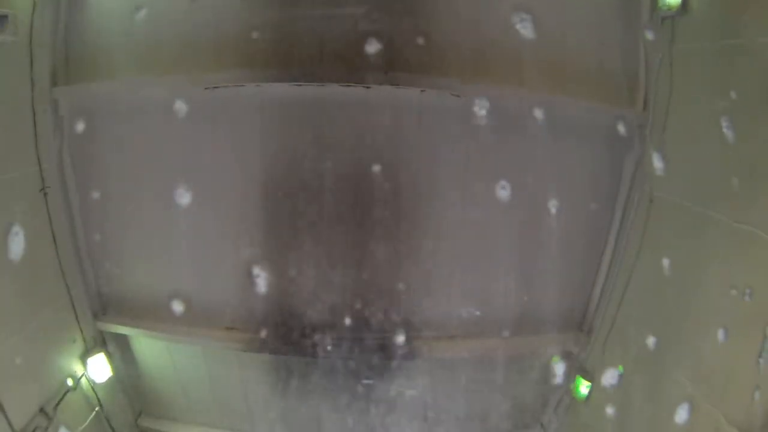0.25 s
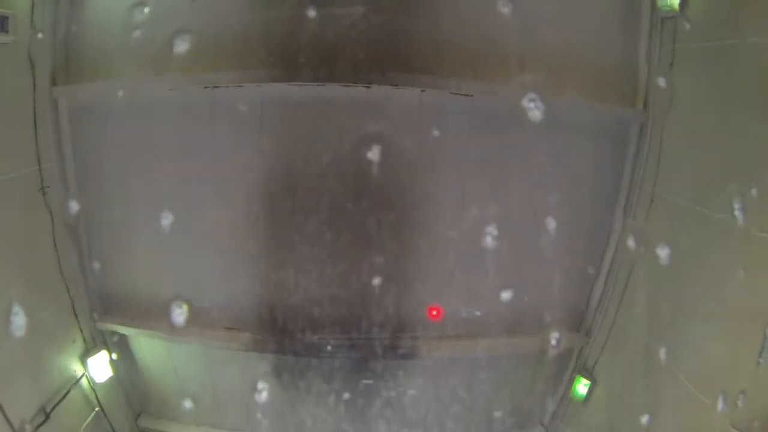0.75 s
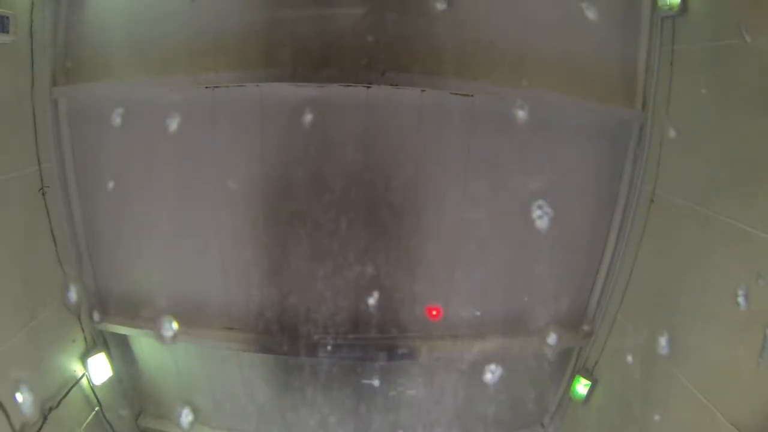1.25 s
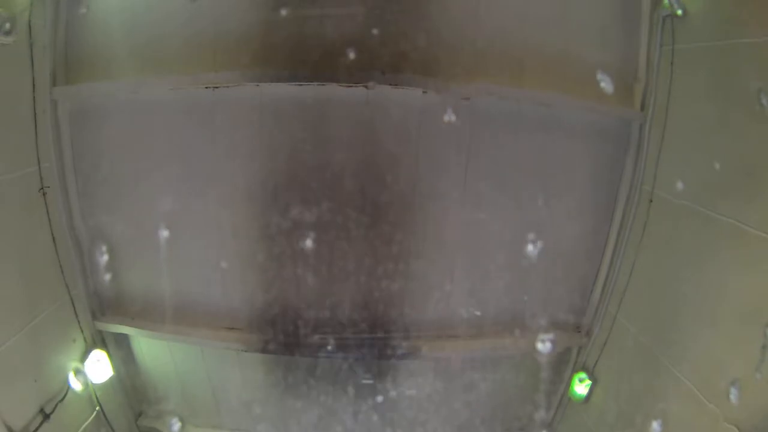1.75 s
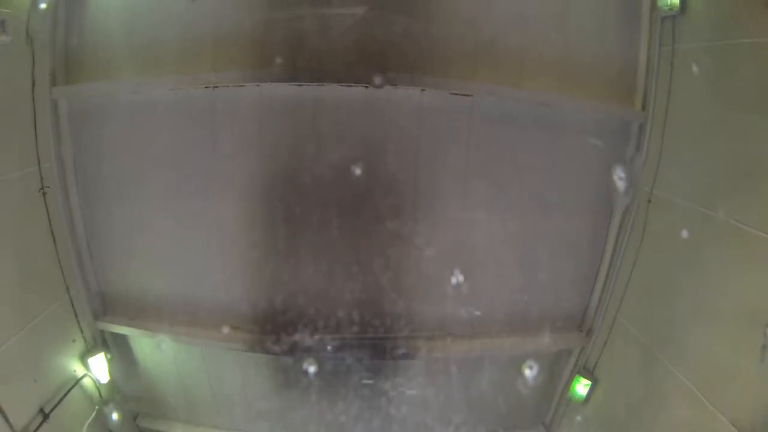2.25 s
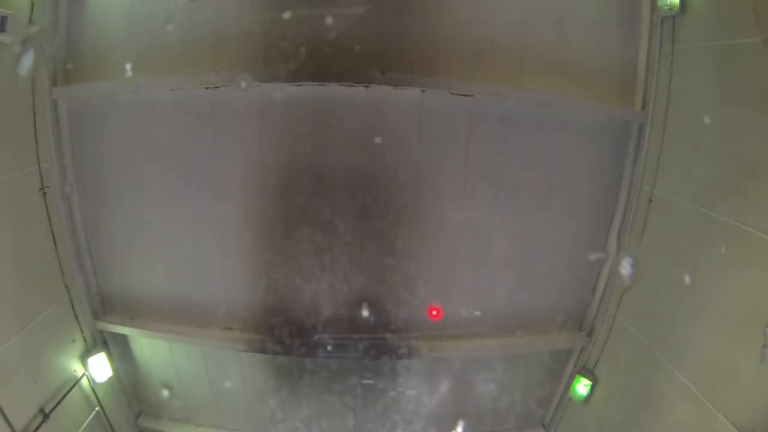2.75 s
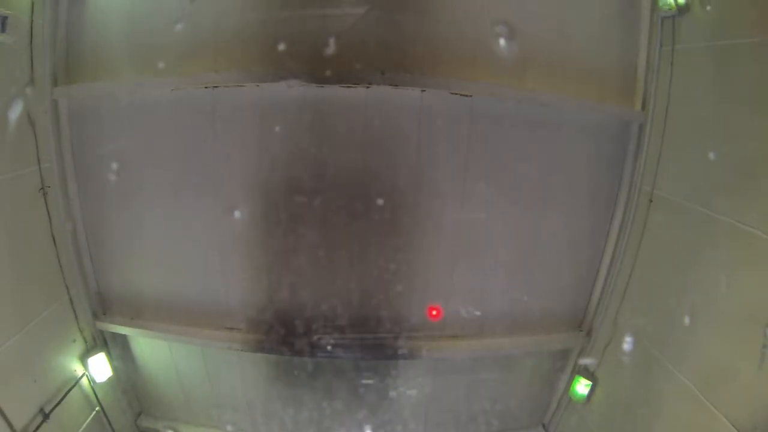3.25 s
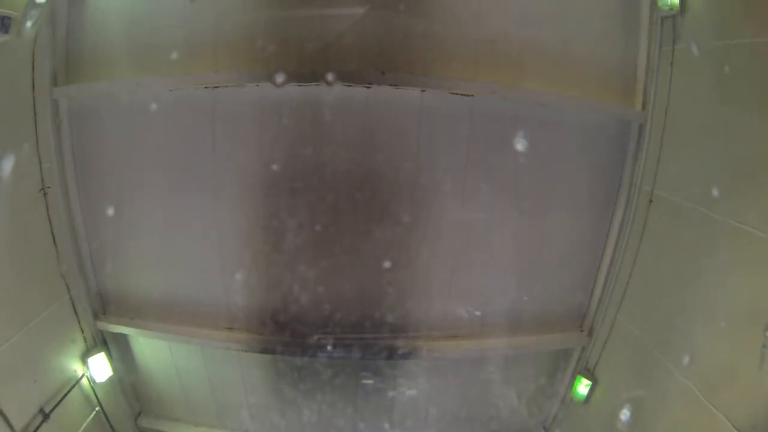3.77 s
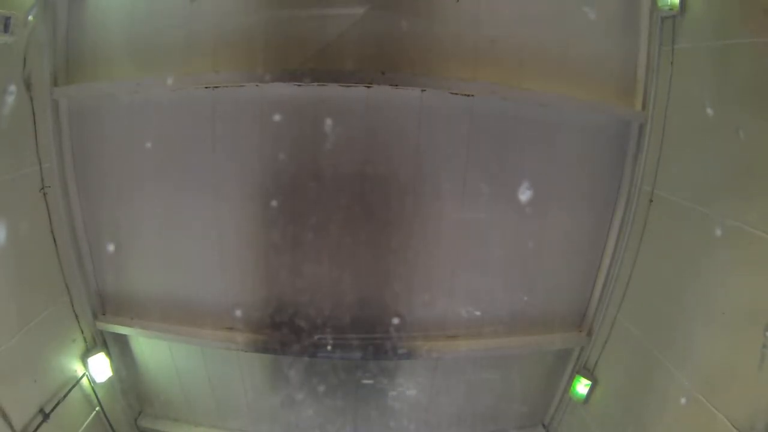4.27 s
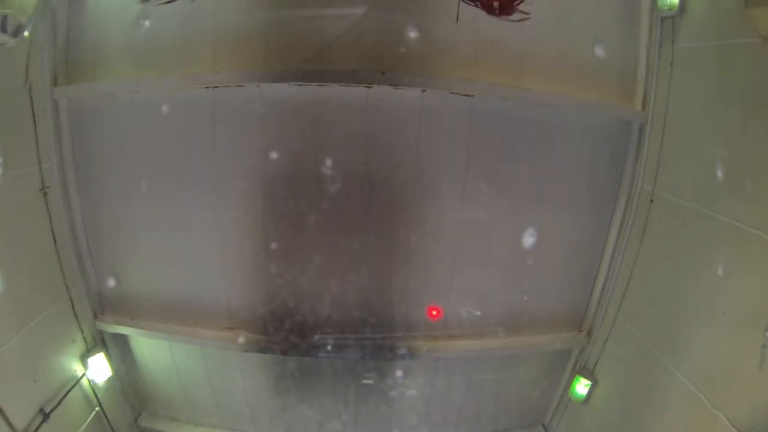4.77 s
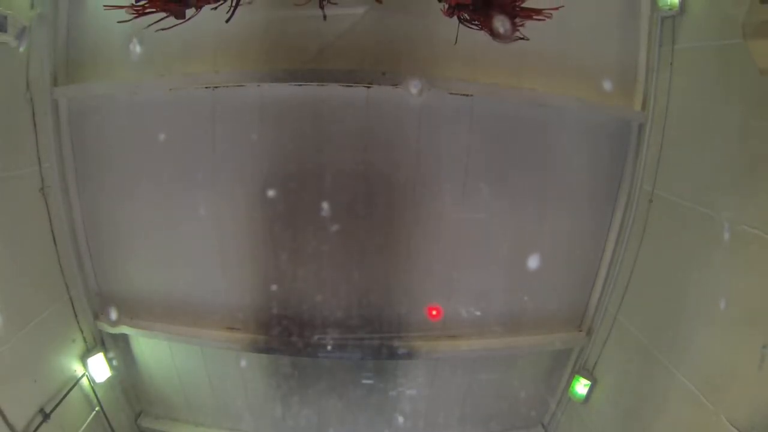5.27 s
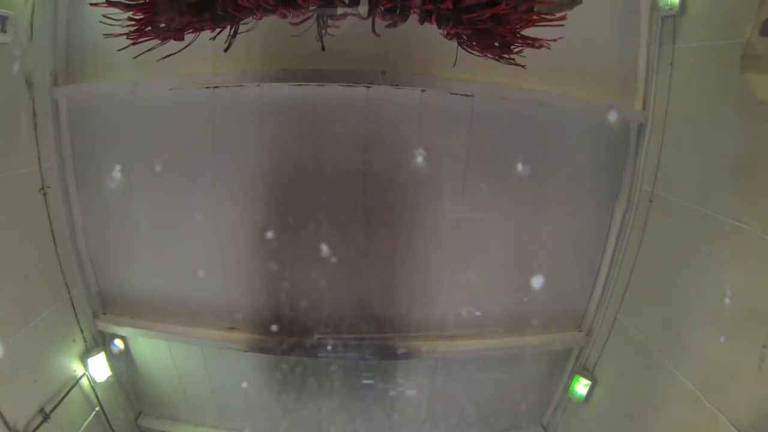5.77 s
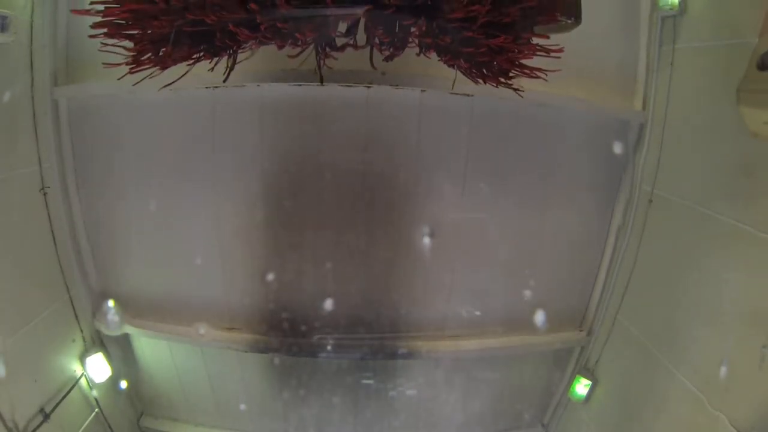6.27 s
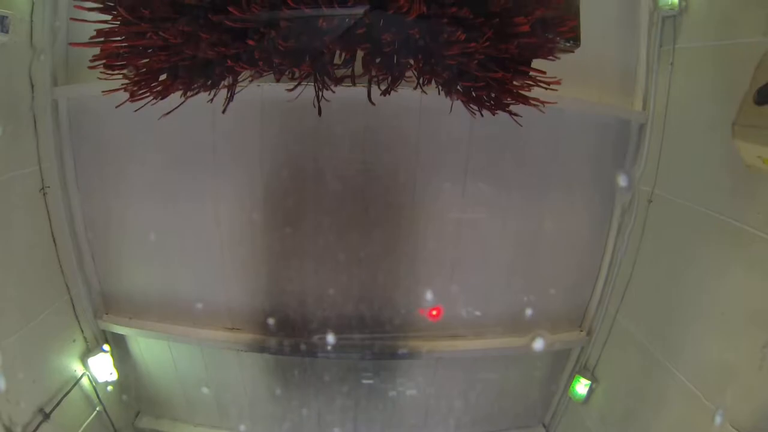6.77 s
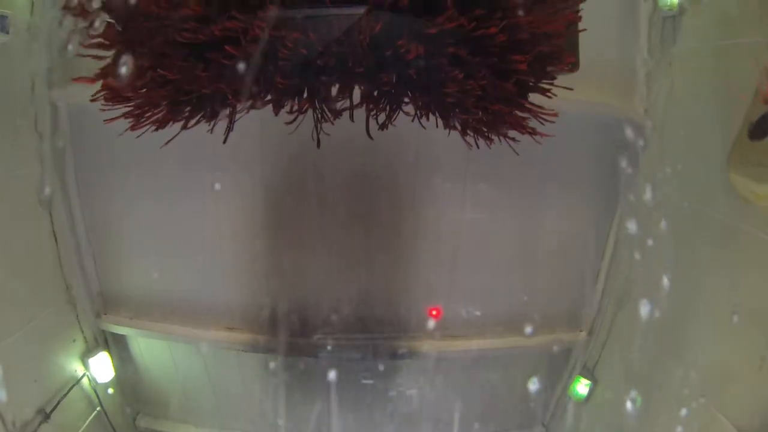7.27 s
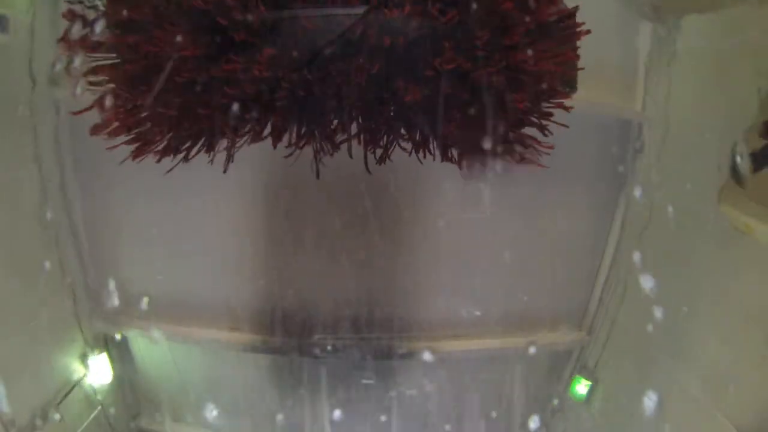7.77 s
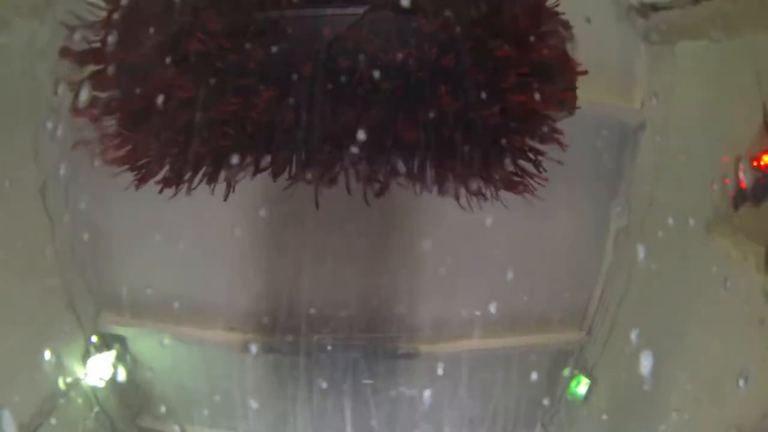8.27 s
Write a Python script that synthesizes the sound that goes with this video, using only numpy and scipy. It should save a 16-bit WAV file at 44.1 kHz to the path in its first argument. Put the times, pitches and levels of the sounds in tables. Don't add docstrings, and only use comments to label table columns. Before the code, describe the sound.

A muffled, close car wash perspective. The opening is very quiet, with soft hiss and low hum. Around three seconds sprays begin slapping the microphone casing in quick groups of four, with sharp water smacks and short gaps. Later the groups merge into longer, denser sheets of pelting water, over heavy body rumble and uneven metallic drumming, loudest at the end.

```python
import sys
import numpy as np
from scipy import signal
from scipy.fft import rfft, irfft
from scipy.io import wavfile
from scipy.ndimage import uniform_filter1d

SR = 44100
rng = np.random.default_rng(int(sys.argv[2]) if len(sys.argv) > 2 else 0)


def log_audio(samples):
    frames = np.atleast_2d(samples).T
    limited = np.clip(frames, -1, 1)
    pcm = np.round(limited * 32767).astype(np.int16)
    wavfile.write(sys.argv[1], SR, pcm)


def undo_db(level):
    steps = np.asarray(level, float) / 20
    return 10 ** steps


N = 375732
TIME = np.arange(N) / SR
FREQ = np.fft.rfftfreq(N, 1 / SR)
TURN_S, FIRST_LULL_S = 0.79, 1.965


def unit(x):
    return x / np.sqrt(np.mean(x ** 2))


def walk(rate_hz):
    hold = int(SR / rate_hz)
    steps = np.repeat(rng.standard_normal(N // hold + 1), hold)
    return unit(uniform_filter1d(uniform_filter1d(steps, hold), hold)[:N])


def lowpass(x, hz):
    return signal.sosfilt(signal.butter(2, hz, fs=SR, output="sos"), x)


def slope(points):
    hz, db = np.transpose(points)
    return undo_db(np.interp(np.log(FREQ + 1), np.log(hz), db))


def ring(x, modes):
    out = 0
    for k, (hz, width_hz, db) in enumerate(modes):
        b, a = signal.iirpeak(hz, hz / abs(width_hz), SR)
        out = out + (-1) ** k * undo_db(db) * signal.lfilter(b, a, x)
    return out


def noise_ring(hz, width_hz):
    return unit(ring(rng.standard_normal(N), [(hz, width_hz, 0)]))


def swells(table, steep):
    for s, db, half_ms, _ in table:
        yield undo_db(2 * db) * np.exp(-np.abs((TIME - s) * 1000 / half_ms) ** steep)


def lulls(depth_db, half_ms, every_s, count):
    middles_s = FIRST_LULL_S + every_s * np.arange(count)
    return sum(depth_db * np.exp(-((TIME - s) * 1000 / half_ms) ** 2) for s in middles_s)


# pitch_hz [Hz], density_db [dB per Hz]
BAY = [(130, -33), (220, -15), (559, -1.5), (741, -4.5), (795, -2.5), (868, -6.5), (1550, -6), (1850, -11),
       (2920, -8), (4700, -14.5), (9010, -22.5), (10200, -22), (14800, -31)]
# pitch_hz [Hz], width_hz [Hz], rise_db [dB]
BAY_HUMPS = [(2930, 490, 3), (5130, 220, 5.5), (10320, 570, 7.5), (13010, 110, -16), (13500, 1600, 6.5)]
# pitch_hz [Hz], width_hz [Hz], level_db [dB rms]
HUM = [(59.8, 1.1, -67), (120.8, 1.7, -63), (182, 2.3, -65)]
# pitch_hz [Hz], level_db [dB rms]
WHINES = [(818.3, -82), (1577, -97), (3295, -88), (5109, -91), (9830, -111), (10427, -97), (12645, -102),
          (12710, -102), (13124, -103)]
BAY_DB = -65


def bay():
    humps_db = sum(db / (1 + (2 * (FREQ - hz) / width_hz) ** 2) for hz, width_hz, db in BAY_HUMPS)
    hiss = unit(irfft(rfft(rng.standard_normal(N)) * slope(BAY) * undo_db(humps_db), N))
    hum = sum(undo_db(db) * noise_ring(hz, width_hz) for hz, width_hz, db in HUM)
    whine = 0
    for hz, db in WHINES:
        whine = whine + undo_db(db + 2.5 + 1.5 * walk(5.5)) * np.sin(2 * np.pi * hz * TIME)
    return undo_db(BAY_DB + 0.5 * walk(9.3)) * hiss + hum + whine


# start_s [s], level_db [dB of rumble re far away]
NEARING = [
    (0, 2),
    (1.2, -1.5),
    (2.1, 5),
    (3.0, 8.5),
    (5.0, 12),
    (6.5, 12),
    (7.2, 14.5),
    (8.52, 14.5),
]


def nearing():
    return np.interp(TIME, *np.transpose(NEARING))


# pitch_hz [Hz], width_hz [Hz], level_db [dB]
BODY = [(26.5, 8.8, -7.5), (39.1, 9.4, -3), (76.2, 17.7, -7.5), (89.7, 14, -20)]
# start_s [s, at the peak], level_db [dB], half_width_ms [ms], pitch_hz [Hz]
BOOMS = [(.28, -49, 80, 58.4), (1.23, -44, 21, 58.1), (1.54, -42.5, 65, 57), (1.87, -44.5, 36, 60),
         (2.2, -41.5, 70, 53.63), (2.5, -37.5, 67, 51), (2.67, -34.5, 45, 56.04), (2.86, -35.5, 50, 50.9),
         (3.03, -32.5, 51, 56.1), (3.32, -34, 51, 61), (3.48, -34, 70, 55.9), (3.71, -32, 42, 57.6),
         (4.14, -36, 36, 48.2), (4.28, -37, 40, 46.95), (4.53, -36, 95, 53.2), (4.92, -38, 57, 50),
         (5.22, -38, 51.6, 50.95), (5.44, -35.5, 53, 45.13), (5.7, -36, 78, 45.94), (5.87, -35, 84, 52.9),
         (6.29, -38.5, 50, 56.6), (6.53, -32.5, 52.5, 44.95), (7.05, -36, 60, 62), (7.22, -32.5, 35, 56.1),
         (7.36, -31.5, 36.7, 52.03), (7.58, -33.5, 44, 55), (7.72, -31.5, 40, 42.8),
         (7.83, -30.5, 50, 45.3), (8.11, -27, 55, 55.1), (8.36, -33.5, 20, 58)]
IDLE_BOOM_DB = -51.5


def body(near_db):
    power = undo_db(2 * (IDLE_BOOM_DB + near_db)) + sum(swells(BOOMS, 1.74))
    boom_db = 10 * np.log10(power)
    boom_hz = np.interp(TIME, *np.transpose(BOOMS)[[0, 3]])
    phase = 2 * np.pi * np.cumsum(boom_hz + 3.516 * walk(12)) / SR
    sway = np.sqrt(2) * np.sin(phase) * undo_db(2.4 * walk(22))
    rumble = undo_db(-2) * unit(ring(rng.standard_normal(N), BODY))
    return undo_db(boom_db - 2.1) * lowpass(sway + rumble, 160)


# pitch_hz [Hz], width_hz [Hz], level_db [dB]
PANEL = [(111, 14, -5), (128, 15.4, 2), (149.5, 13.8, -0.5), (183.5, 8.8, 0), (211.2, 17.5, 0.5),
         (239, 10.4, -1.5), (272, 12.5, -2), (306, 12.6, -4), (351.1, 13.7, -3), (383, 18, -9),
         (459, 120, -5)]
# [Hz, tone of the spot under the jet]
DRUMS = [(1.5, -57.5, 180, 169), (1.83, -50.5, 66, 168), (2.16, -48.5, 123, 154), (2.49, -47, 57, 138),
         (2.6, -42, 76, 207), (2.88, -43.5, 70, 129), (3.03, -39.5, 81, 185), (3.27, -43.5, 83, 190.2),
         (3.43, -42, 93, 153), (3.76, -39, 105, 130), (3.98, -40.5, 130, 122.9), (4.17, -36, 60.4, 186.2),
         (4.63, -40, 111, 121), (4.9, -42, 110, 108), (5.34, -42.5, 40.3, 145.8), (5.49, -38.5, 85, 189),
         (5.7, -37, 47, 179), (5.82, -48.5, 68, 135.7), (6.17, -39.5, 80, 137.3), (6.3, -40, 80, 128),
         (6.49, -37.5, 89, 125.7), (6.88, -39.5, 82, 124), (7.03, -33.5, 68, 182), (7.25, -35.5, 82, 159.3),
         (7.39, -36.5, 72, 200), (7.63, -36, 59, 149), (7.77, -33.5, 96, 122), (8.08, -33.5, 117, 184.9),
         (8.24, -35, 48.5, 210), (8.45, -31.5, 69, 212)]
IDLE_DRUM_DB, DRUM_PER_NEAR = -59, 0.62
DRUM_LULL_DB, DRUM_LULL_MS = -6, 30
UPPER_DB, UPPER_PER_DB, UPPER_PER_NEAR = -13, 0.56, -0.36


def panels(near_db):
    idle_db = IDLE_DRUM_DB + DRUM_PER_NEAR * near_db
    drum_db = 10 * np.log10(undo_db(2 * idle_db) + sum(swells(DRUMS, 2.14)))
    drum_db = drum_db + lulls(DRUM_LULL_DB, DRUM_LULL_MS, TURN_S / 2, count=5)
    upper_db = UPPER_DB + UPPER_PER_DB * (drum_db - idle_db) + UPPER_PER_NEAR * near_db
    spot_hz = np.interp(TIME, *np.transpose(DRUMS)[[0, 3]])
    drum, power = 0, 0
    for hz, width_hz, db in PANEL:
        suits_db = 6 * np.exp(-(np.log2(hz / spot_hz) / 0.13) ** 2)
        share = undo_db(db + suits_db + 2 * walk(9) + (hz > 230) * (upper_db + 8))
        drum = drum + share * noise_ring(hz, width_hz)
        power = power + share ** 2
    return lowpass(undo_db(drum_db + 0.14) * drum / np.sqrt(power), 600)


# start_s [s], level_db [dB]
MIST = [
    (0, -72),
    (1.5, -68),
    (1.95, -62.5),
    (2.24, -56),
    (2.7, -55),
    (3.6, -54.5),
    (4.25, -62.5),
    (5.2, -64.5),
    (6.7, -61.5),
    (8.52, -59),
]
LULL_DB, LULL_MS = -13, 33
RUNOFF_DB, RUNOFF_S = -14, 0.028


def mist(jet_power):
    drift_db = np.interp(TIME, *np.transpose(MIST))
    lull_db = lulls(LULL_DB, LULL_MS, TURN_S, count=3)
    keep = np.exp(-1 / (RUNOFF_S * SR))
    runoff = signal.lfilter([1 - keep], [1, -keep], jet_power)
    return undo_db(drift_db + lull_db) + undo_db(RUNOFF_DB) * np.sqrt(runoff)


def drops(per_s, scatter_db):
    hit = rng.random(N) < per_s / SR
    size = np.minimum(rng.exponential(size=N), 4)
    return unit(hit * rng.standard_normal(N) * undo_db(scatter_db * size))


# start_s [s], level_db [dB peak]
GOBS = [(2.9097, -45), (3.0644, -29.5), (3.5714, -60), (3.8348, -23.5), (4.0914, -23.5), (4.145, -19.5),
        (4.624, -21), (4.9936, -34), (5.2659, -44), (5.29, -34), (5.434, -23), (6.7387, -47), (7.506, -40),
        (8.315, -43), (8.422, -26)]


def gobs():
    t = np.arange(int(0.03 * SR)) / SR
    envelope = np.exp(-t / 0.0042) * np.minimum(t / 0.0025, 1)
    out = np.zeros(N + len(t))
    for s, db in GOBS:
        blow = 0
        for (hz, _, mode_db), chance in zip(HOUSING[1:8], rng.random(7)):
            blow = blow + undo_db(mode_db) * np.sin(2 * np.pi * (hz * t + 0.3 * chance))
        blow = blow * envelope
        start = int(s * SR)
        out[start:start + len(t)] += undo_db(db - 5.5) * blow / np.abs(blow).max()
    return out[:N]


# start_s [s, at the peak], level_db [dB], half_width_ms [ms], brightness_db [dB]
JETS = [(2.935, -49.5, 43, 2), (3.087, -44, 27, 2.5), (3.205, -43.5, 26, 1), (3.328, -40, 35, -0.5),
        (3.726, -41.5, 54, -0.5), (3.859, -38, 42.5, 1.5), (3.99, -42.5, 37.5, 0.5), (4.121, -37, 40.7, 0),
        (4.514, -37.5, 32.8, -3.5), (4.641, -37, 53, -1.5), (4.774, -42, 54, -0.5), (4.908, -40, 39.6, 1),
        (5.315, -37.5, 28, -2), (5.429, -37, 60, -2), (5.564, -38, 57, -2.5), (5.693, -38, 35, -1.5),
        (6.218, -38, 26.8, -2.5), (6.322, -36.5, 90, -4), (6.496, -38.5, 33, 0), (6.807, -45, 43, -1.5),
        (6.99, -36, 52, 0), (7.239, -38.5, 78, 0.5), (7.34, -39, 44.6, 0.5), (7.687, -36, 59.4, -1.5),
        (7.779, -42.5, 50, 3), (8.018, -39, 70, 0), (8.11, -35, 25.6, -4.5), (8.343, -43.5, 39, 1),
        (8.461, -33, 73, -1)]
# start_s [s, at the peak], level_db [dB], half_width_ms [ms], brightness_db [dB]
FRINGES = [
    (2.38, -72, 16, 15),
    (4.47, -59, 18, 6),
    (5.27, -61, 6.9, 7),
    (6.065, -49, 26, 3),
    (6.753, -47, 21, 0),
    (7.54, -52.5, 21, 7),
]
# start_s [s, at the middle], level_db [dB], half_width_ms [ms], brightness_db [dB]
SHEETS = [
    (6.308, -40.5, 227, 0),
    (7.14, -39.5, 320, 1),
    (7.9, -39.5, 344, 0.7),
]
# pitch_hz [Hz], width_hz [Hz], level_db [dB]
HOUSING = [(736, 53, -10.5), (1215, 32, -4), (1262, 39, -3.5), (1347, 39, -2.5), (1477, 22, 1),
           (1560, 33, 1.5), (1596, 40, 0.5), (1747, 70, -6.5), (2036, 37, -8.5), (2131, 74, -13.5),
           (2826, 44, -12), (3526, 155, -15.5), (3765, 188, -14), (4820, 210, -24), (5540, 310, -33),
           (7030, 480, -36.5), (7920, 1240, -35.5), (9900, 500, -42.5)]
# pitch_hz [Hz], level_db [dB]
WALL = [(200, -21), (450, -12), (900, -14.5), (2400, -19), (3300, -18.5), (4500, -44), (6100, -46),
        (9400, -62), (11500, -60), (14000, -72)]
STING_DB = -45.5


def housing():
    power, bright = np.zeros(N), np.zeros(N)
    for table, steep in (([*JETS, *FRINGES], 3), (SHEETS, 14)):
        for row, sweep in zip(table, swells(table, steep)):
            power += sweep
            bright += sweep * undo_db(2 * row[-1])
    soft = np.sqrt(power) + mist(power)
    ragged = undo_db(0.81 * walk(70) + 0.61 * walk(14))
    faces = []
    for _ in range(4):
        pelt = drops(per_s=6000, scatter_db=2) * ragged * undo_db(0.32 * walk(30))
        low = lowpass(pelt, 2400)
        faces.append(soft * low + np.sqrt(bright) * (pelt - low))
    rung = sum(ring(force, HOUSING[face::3]) for face, force in enumerate(faces[:3]))
    rung = lowpass(rung, 9500)
    fine = signal.sosfilt(signal.butter(2, [7000, 11000], "band", fs=SR, output="sos"), pelt)
    rung = rung + undo_db(STING_DB) * np.sqrt(sum(swells(JETS[:8], 3))) * fine
    through = irfft(rfft(faces[3]) * slope(WALL + np.array([0, -3])), N)
    onset = np.minimum(TIME / 0.01, 1)
    return undo_db(16) * onset * (rung + through)


def scene():
    near_db = nearing()
    car = body(near_db) + panels(near_db)
    water = gobs() + housing()
    return (bay() + car + water)[None, :]


def roll_off(x):
    return signal.sosfilt(signal.butter(12, 14900, fs=SR, output="sos"), x)


def record(dry):
    mix = signal.sosfilt(signal.butter(2, 22, "high", fs=SR, output="sos"), dry)
    return roll_off(mix)


dry = scene()
out = record(dry)
log_audio(out)
```